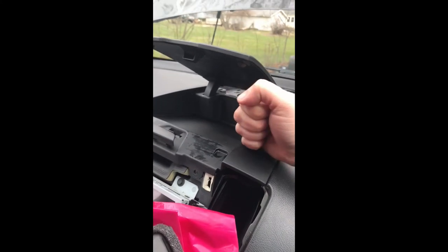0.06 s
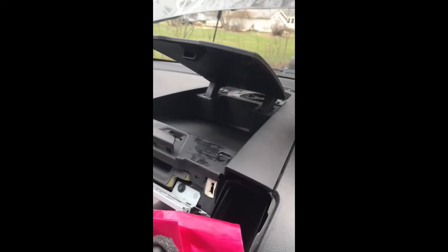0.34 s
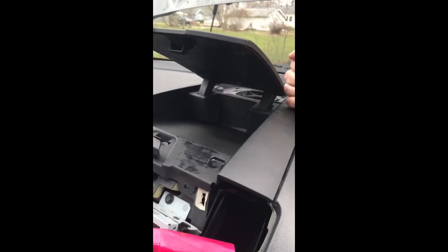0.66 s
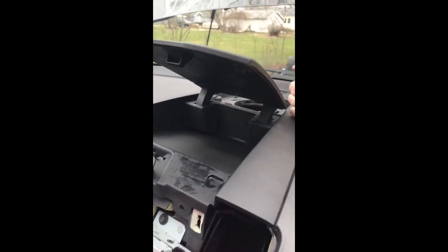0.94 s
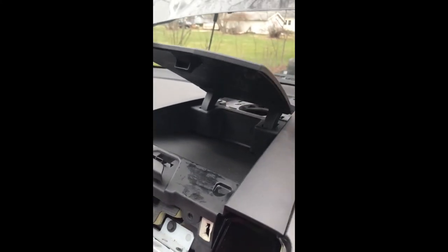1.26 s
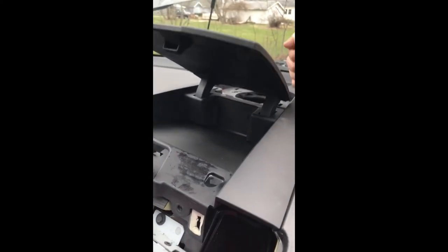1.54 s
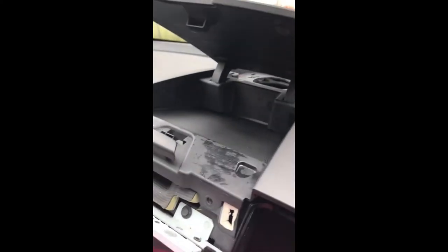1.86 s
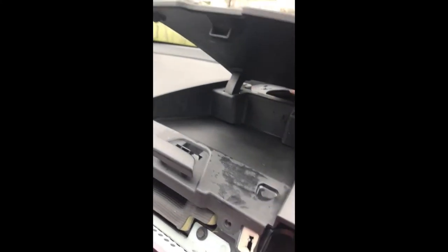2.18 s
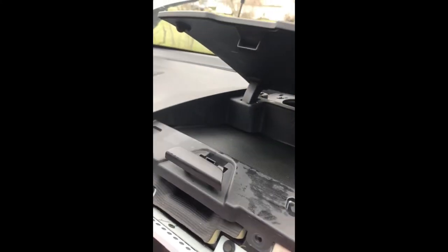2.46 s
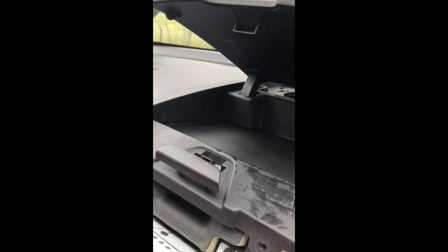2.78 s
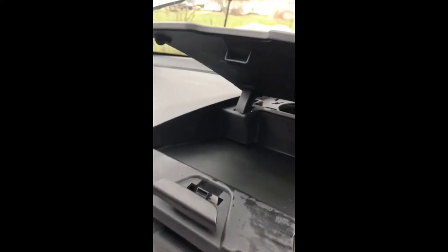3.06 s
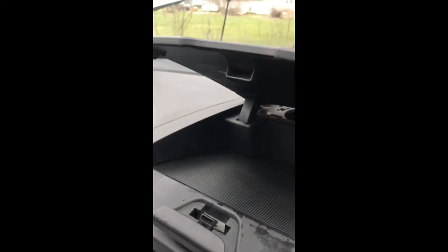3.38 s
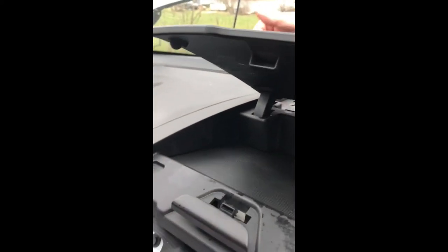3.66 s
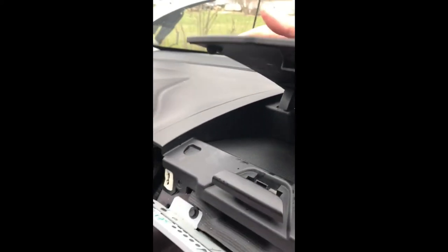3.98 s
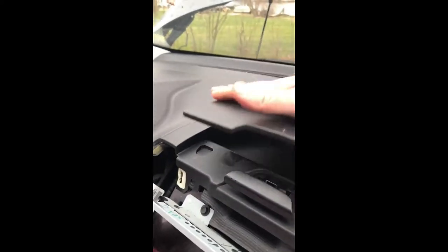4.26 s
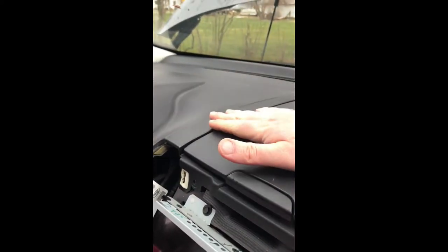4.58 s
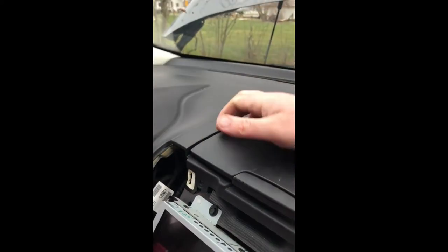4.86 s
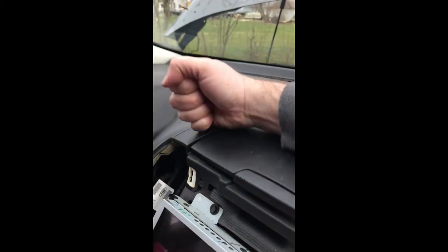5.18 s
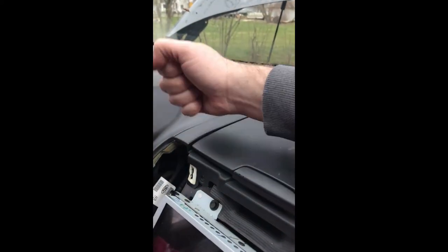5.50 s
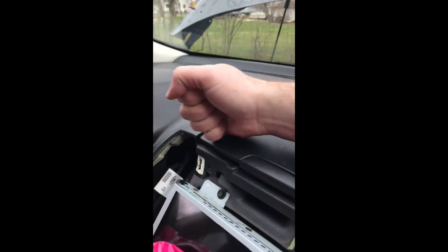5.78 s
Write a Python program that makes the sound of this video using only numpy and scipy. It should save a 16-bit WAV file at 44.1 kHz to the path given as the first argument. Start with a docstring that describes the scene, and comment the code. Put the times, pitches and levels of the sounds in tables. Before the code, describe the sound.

Close, boomy knocks on a car dash and sharp plastic clacks as a bin lid springs open and later latches shut.

```python
"""Inside a parked car, a phone microphone close to the dashboard. Over a low rumble, hand and sleeve brush
about and a few light knocks land. From one second in, a fist thumps the dash and the plastic lid of its
storage bin pops open; later a palm presses it shut and it latches. Each hard blow is a quick cluster of
plastic contacts over a knock of the dash panel and a boom of the cabin air. After it, loose trim buzzes
and the steel latch may ring faintly. The phone's limiter holds the peaks."""
import sys
import numpy as np
from scipy import signal
from scipy.fft import rfft, irfft, next_fast_len
from scipy.io import wavfile
from scipy.ndimage import uniform_filter1d, minimum_filter1d, map_coordinates

SR = 44100
rng = np.random.default_rng(int(sys.argv[2]) if len(sys.argv) > 2 else 0)


def inscribe(sig):
    """Save sig as 16-bit PCM at rate SR to the path in sys.argv[1].

    A 1-D sig is mono; a 2-D sig holds one channel per row.
    Samples are clipped to [-1, 1] before scaling.
    """
    pcm = np.round(np.clip(np.atleast_2d(sig).T, -1, 1) * 32767)
    wavfile.write(sys.argv[1], SR, pcm.astype(np.int16))


N = 257279
AGE = np.arange(SR) / SR  # seconds since a strike

# Levels in the tables are relative within each column.
# contacts of lid, catch and button: start_s, snap_db, clack_db, knock_db, lid_spot_hz, bin_spot_hz
PLASTIC_CONTACTS = [(.003, -29, -37, -46, 1870, 970), (.919, -54, -65, -47.5, 1000, 450),
                    (.9932, -17.5, -25, -32, 1910, 635), (1.006, -5.5, -14.5, -23.5, 1025, 560),
                    (1.0248, -20, -29, -29, 1930, 936), (1.0862, -34, -42, -66, 2140, 640),
                    (2.1207, -2.5, -10, -19.5, 1485, 813), (2.1525, -22, -36.5, -35, 1500, 329),
                    (3.1826, -18.5, -15.5, -22.5, 2200, 560), (3.1915, -3.5, -16, -17.5, 3200, 657),
                    (3.2011, -4, -17.5, -20.5, 2910, 422), (3.3038, -38.5, -46, -60, 1170, 860),
                    (3.328, -50, -52, -58.5, 1120, 866), (4.4528, -12, -22.5, -26, 1550, 560),
                    (4.4936, -44.5, -54, -50.5, 5980, 575), (4.556, -10.5, -24.5, -30, 2000, 820),
                    (4.5648, -3.5, -16.5, -18, 1250, 343.6), (4.7748, -28.5, -40.5, -46, 4960, 950),
                    (4.794, -31.5, -40, -46.5, 5040, 347), (4.845, -32.5, -39, -48, 960, 980),
                    (5.2227, -19.5, -26.5, -25, 1390, 494), (5.2309, -16.5, -20.5, -21.5, 1280, 652),
                    (5.2632, -31, -37, -39.5, 1265, 353), (5.447, -31.5, -42, -45, 5040, 600),
                    (5.636, -21, -27.5, -31, 1460, 480), (5.6462, -24.5, -28.5, -27.5, 996, 320),
                    (5.6803, -32, -31, -43.5, 1230, 550), (5.737, -35, -44, -47, 1070, 607)]
# spectrum of a plastic edge snapping: frequency_hz, level_db
SNAP_SPECTRUM = [(300, -17.5), (1000, -2), (2200, -1), (2900, 3.5), (3400, -1), (4100, -1), (4800, -4),
                 (5300, -2.5), (5700, -1), (6500, -4), (8500, -6), (10000, -8), (12000, -8.5), (16000, -12)]
# resonances of the lid: pitch_hz, width_hz, level_db
LID_MODES = [(1027, 150, 1), (1236, 250, 2.5), (1530, 130, 2), (1755, 100, -0.5), (1935, 94, -0.5),
             (2210, 120, -1.5), (2360, 75, -2), (2720, 35, -2.5), (2917, 54, -9), (2975, 130, -13.5),
             (4130, 160, -12)]
# resonances of the hollow bin: pitch_hz, width_hz, level_db
BIN_MODES = [(333, 55, -5.5), (404, 70, -1.5), (534, 54, -3), (641, 65, 0.5), (756, 73, -4.5),
             (858, 72, -4)]
# blows that shake the dashboard: start_s, panel_db, frame_db, boom_db, panel_hz
DASH_BLOWS = [(.002, -27.5, -33.5, -27.5, 202.5), (.527, -30.5, -36, -38, 139.5),
              (.917, -28.5, -33.5, -43, 225), (.952, -51, -36.5, -27.5, 151),
              (1.006, -9.5, -18.5, -27.5, 206), (1.704, -40.5, -38, -32.5, 229.6),
              (2.122, -5, -25.5, -16, 210.5), (3.194, -12.5, -25.5, -27, 192.5), (4.46, -20, -28, -29, 173),
              (4.565, -13, -41, -30.5, 178.4), (5.231, -8.5, -24.5, -18.5, 211.4),
              (5.647, -13, -31.5, -22, 204.8)]
# modes of the dash panel: ratio_to_panel_hz, level_db, t60_s
PANEL_MODES = [(.64, -9, 0.22), (.8, -7, 0.15), (.9, -2, 0.13), (1.001, 5, 0.094), (1.08, -9.5, 0.11),
               (1.18, -8.5, 0.12), (1.5, -15.5, 0.18), (1.9, -17, 0.12)]
# flicks of the steel latch pawl: start_s, level_db
PAWL_FLICKS = [(1.011, -47.5), (2.128, -30.5), (3.204, -37), (5.249, -33), (5.656, -47)]
# modes of the pawl: pitch_hz, level_db, t60_s
PAWL_MODES = [(9733, -10, .15), (13380, -2, .23), (13520, -6, .17), (13820, -3, .16), (14080, -10, .38),
              (14230, -4, .24)]
# plucks of the long lid spring: start_s, level_db
SPRING_PLUCKS = [(2.128, -49), (5.239, -51)]
# modes of the spring: pitch_hz, level_db, t60_s
SPRING_MODES = [(1701, 0, 1.6), (1723, -1, 1.2)]
# strokes of hand and sleeve: start_s, length_s, hiss_db, rub_db, rub_hz
SLEEVE_STROKES = [(0.009, 0.12, -53, -56.5, 1800), (0.178, 0.63, -59.5, -66, 1880),
                  (0.541, 0.32, -59.5, -59.5, 1540), (0.832, .13, -58.5, -67, 2000),
                  (1.188, 0.051, -55, -75, 2000), (1.289, 0.8, -59.5, -67, 1940),
                  (1.895, 0.47, -60.5, -53, 1250), (2.377, 0.69, -63, -63, 1980),
                  (2.752, 0.24, -66, -61.5, 1940), (3.018, 0.21, -61, -62, 1980),
                  (3.134, 0.15, -44, -52, 2330), (3.442, 0.089, -56, -62, 2200),
                  (3.568, 0.42, -69, -64, 3040), (3.986, 0.12, -52.5, -55.5, 2200),
                  (4.083, .29, -57.5, -56.5, 2000), (4.597, 0.076, -45.5, -50, 2280),
                  (4.808, 0.13, -48, -55, 2760), (5.706, 0.11, -47, -72, 1480)]
# spectrum of their hiss: frequency_hz, level_db
BRUSH_SPECTRUM = [(470, -45.5), (800, -8), (1630, -8.5), (4800, -4), (6330, -3), (10600, -8), (13900, -7),
                  (16000, -7)]
# reverberation of the cabin: frequency_hz, t60_s
CABIN_DECAY = [(100, .25), (500, 0.14), (2000, 0.12), (6000, 0.11), (15000, 0.07)]
# spectrum of the low rumble: frequency_hz, level_db
RUMBLE_SPECTRUM = [(13, -34.5), (22, -9), (35, -7), (54, 1.5), (69, 0), (81, -16), (102, -14.5), (140, -16),
                   (243, -18.5), (360, -30), (614, -34), (700, -32.5), (910, -54.5), (1540, -120)]
# spectrum of the faint midrange wash: frequency_hz, level_db
WASH_SPECTRUM = [(320, -44.5), (550, -18), (781, 1), (890, -1.5), (1060, -3.5), (1310, -4.5), (1810, -11),
                 (2600, -18), (3380, -45.5), (5720, -120)]
# slow swell of the wash: time_s, level_db
WASH_SWELL = [(0.0, -64.5), (0.62, -60.5), (1.32, -63.5), (2.08, -56.5), (2.24, -65), (3.16, -59.5),
              (3.36, -64), (5.83, -64.5)]
# spectrum of the steady hiss: frequency_hz, level_db
HISS_SPECTRUM = [(1060, -37), (1800, -7.5), (2080, -12), (2410, 1), (5490, -5.5), (10300, -11), (14900, -9),
                 (16000, -17)]


def plastic():
    """Each contact snaps at the edge; the lid answers with a clack and the bin with a hollow knock."""
    snaps, hollow = np.zeros((2, N))
    for start_s, snap_db, clack_db, knock_db, lid_hz, bin_hz in PLASTIC_CONTACTS:
        snap, clack, knock = np.zeros((3, SR // 2))
        for delay, edge_db, lid_db, bin_db in bounces():
            add(snap, delay, amp(snap_db + edge_db - 4.5) * chatter(.00072, t60=.038, grain_db=2))
            add(clack, delay, amp(clack_db + lid_db + 2.5) * chatter(.0006, t60=.043, grain_db=2))
            add(knock, delay, amp(knock_db + bin_db + 7.5) * chatter(.00039, t60=.022, grain_db=1.5))
        add(snaps, start_s, snap)
        add(hollow, start_s, filtered(clack, lambda hz: struck(LID_MODES, hz, lid_hz)))
        add(hollow, start_s, filtered(knock, lambda hz: struck(BIN_MODES, hz, bin_hz)))
    return filtered(snaps, causal(SNAP_SPECTRUM)) + hollow


def bounces():
    """A part strikes, seats more dully, then rebounds ever weaker: delay_s, snap_db, clack_db, knock_db."""
    strike, seat = (0, 0, 0, 0), (.006, -11, -4.5, 2.5)
    flights_s = .03 * np.exp(.15 * rng.standard_normal(size=3))
    levels_db = -27.5 - 7.5 * np.arange(len(flights_s))
    rebounds = [(delay, db, db, db) for delay, db in zip(np.cumsum(flights_s), levels_db)]
    return [strike, seat] + rebounds


def chatter(attack_s, t60, grain_db):
    """The dense, uneven micro-impacts of one plastic contact."""
    t = AGE[:SR // 4]
    grain = unit(uniform_filter1d(rng.standard_normal(len(t)), size=24))
    impacts = unit(rng.standard_normal(len(t)) * amp(grain_db * grain))
    return impacts * fade(t, t60) * (1 - np.exp(-t / attack_s))


def struck(modes, hz, spot_hz):
    """A body's response at unit power; the resonances near the struck spot's own speak loudest."""
    emphasis = 1 + 2.7 * resonance(hz, spot_hz, width=.1 * spot_hz)
    return unit(body(modes, hz) * emphasis + 4 * resonance(hz, spot_hz, width=70))


def body(modes, hz):
    """A plastic part's resonances, summed with alternating signs, at unit power."""
    return unit(sum((-1) ** k * amp(db) * resonance(hz, centre, width)
                    for k, (centre, width, db) in enumerate(modes)))


def dashboard():
    """A blow flexes the dash panel and its frame, which pump the lowest air mode of the cabin."""
    out = np.zeros(N)
    for start_s, panel_db, frame_db, boom_db, panel_hz in DASH_BLOWS:
        modes = [(ratio * panel_hz, db, t60) for ratio, db, t60 in PANEL_MODES]
        add(out, start_s, amp(panel_db - .36) * ring(modes, attack_s=.0056))
        add(out, start_s, amp(frame_db + 9.5) * mode(hz=92, t60=.23, attack_s=.02))
        add(out, start_s, amp(boom_db + 8) * mode(hz=53, t60=.35, attack_s=.025))
    return out


def ring(modes, attack_s):
    """Modes struck together, each about a decibel stronger or weaker every time."""
    return sum(amp(db + rng.standard_normal()) * mode(hz, t60, attack_s) for hz, db, t60 in modes)


def mode(hz, t60, attack_s):
    """A damped sine that builds up over the attack time."""
    return np.sin(2 * np.pi * hz * AGE) * fade(AGE, t60) * (1 - np.exp(-AGE / attack_s))


def trim_rattle():
    """Loose trim buzzes against the lid while the dashboard settles, the louder the harder the blow."""
    hard_blow_db, lag_s = -10, .012
    buzz = np.zeros(N)
    for start_s, panel_db, *_ in DASH_BLOWS:
        buzz_db = -33.5 + 1.1 * (panel_db - hard_blow_db)
        add(buzz, start_s + lag_s, amp(buzz_db) * chatter(.0021, t60=.24, grain_db=-1.5))
    buzz *= amp(1.5 * wobble(110))
    edge = causal(SNAP_SPECTRUM)
    return filtered(buzz, lambda hz: body(LID_MODES, hz) + amp(-4) * body(BIN_MODES, hz)
                    + amp(-2.5) * edge(hz))


def latch():
    """The small steel pawl sings briefly when flicked; the long lid spring swells slowly and rings on."""
    out = np.zeros(N)
    for start_s, db in PAWL_FLICKS:
        add(out, start_s, amp(db) * ring(PAWL_MODES, attack_s=.015))
    for start_s, db in SPRING_PLUCKS:
        add(out, start_s, amp(db) * ring(SPRING_MODES, attack_s=.14))
    return out


def brushing():
    """Skin and cloth slide near the microphone: a wide hiss over a narrower rubbing band."""
    hiss_level, rub = np.zeros((2, N))
    for start_s, length_s, hiss_db, rub_db, rub_hz in SLEEVE_STROKES:
        pressure = stroke(length_s)
        friction = rng.standard_normal(len(pressure))
        band = filtered(friction, lambda hz: resonance(hz, rub_hz, width=1.53 * rub_hz) ** 2)
        add(hiss_level, start_s, amp(hiss_db) * pressure)
        add(rub, start_s, amp(rub_db) * pressure * unit(band))
    return (hiss_level * noise(BRUSH_SPECTRUM) + rub) * amp(1.2 * wobble(71))


def stroke(length_s):
    """Pressure of one stroke: it catches, holds and lets go, each ease lasting at most 0.1 s."""
    t = np.arange(max(int(length_s * SR), 2)) / SR
    rise_s, fall_s = np.minimum([.2 * length_s, .44 * length_s], .1)
    ramp = np.clip(np.minimum(t / rise_s, (length_s - t) / fall_s), 0, 1)
    return np.sin(np.pi / 2 * ramp) ** 2


def cabin_echo(x):
    """The short, dense echo of glass and upholstery around the microphone."""
    hz, t, spectra = signal.stft(rng.standard_normal(SR // 2), SR, nperseg=256)
    tail = signal.istft(spectra * fade(t, along(CABIN_DECAY, hz)[:, None]), SR, nperseg=256)[1]
    tail *= 1 - np.exp(-AGE[:len(tail)] / .00083)  # the echo builds in about a millisecond
    return signal.fftconvolve(x, tail / np.linalg.norm(tail))[:N]


def background():
    """Room tone of the closed car: uneven rumble, a slowly swelling midrange wash, a thin steady hiss."""
    rumble = amp(-45.5 + 2.3 * wobble(9)) * noise(RUMBLE_SPECTRUM)
    swell_db = 1 + np.interp(np.arange(N) / SR, *np.transpose(WASH_SWELL))
    wash = amp(swell_db + .71 * wobble(6.8)) * noise(WASH_SPECTRUM)
    return rumble + wash + amp(-70) * noise(HISS_SPECTRUM)


def noise(spectrum):
    """Coloured noise of rms 1."""
    return unit(filtered(rng.standard_normal(N), lambda hz: amp(along(spectrum, hz))))


def wobble(rate_hz):
    """A smooth random curve, rate_hz knots a second."""
    knots = rng.standard_normal(int(N * rate_hz / SR) + 4)
    return map_coordinates(knots, [np.arange(N) * rate_hz / SR])


def resonance(hz, centre, width):
    """Causal response of one resonance, centre and width in Hz."""
    return 1j * hz * width / (centre ** 2 - hz ** 2 + 1j * hz * width)


def causal(spectrum):
    """Minimum-phase response of unit power with the given spectrum."""
    def response(hz):
        cepstrum = irfft(np.log(unit(amp(along(spectrum, hz)))))
        half = len(cepstrum) // 2
        return np.exp(rfft(np.r_[cepstrum[0], 2 * cepstrum[1:half]], 2 * half))
    return response


def filtered(x, response):
    """Pass x through a complex response of frequency."""
    size = next_fast_len(len(x) + SR // 2)
    hz = np.fft.rfftfreq(size, 1 / SR)
    return irfft(rfft(x, size) * response(hz), size)[:len(x)]


def along(points, hz):
    """Read (frequency_hz, value) points on a log frequency axis."""
    frequencies, values = np.transpose(points)
    return np.interp(np.log(hz + 1), np.log(frequencies + 1), values)


def add(track, start_s, sound):
    """Mix a sound into the track at start_s."""
    start = max(round(start_s * SR), 0)
    part = track[start:start + len(sound)]
    part += sound[:len(part)]


def fade(t, t60):
    """Exponential decay, 60 dB in t60 seconds."""
    return amp(-60 * t / t60)


def amp(db):
    """Decibels to gain."""
    return 10 ** (np.asarray(db) / 20)


def unit(x):
    """Scale to rms 1."""
    return x / np.sqrt(np.mean(np.abs(x) ** 2) + 1e-20)


def scene():
    """Lid, dashboard, latch and hand from close by, in mono, with a little cabin echo and room tone."""
    clicks, thumps = plastic(), dashboard()
    echo = cabin_echo(amp(-15.5) * clicks + amp(-12) * thumps)
    return (clicks + thumps + trim_rattle() + echo + latch() + brushing() + background())[None]


def record(dry):
    """The phone's fast limiter holds the peaks; a steep low-pass then cuts the highest treble."""
    ceiling_db, top_hz = -3.5, 16100
    x = dry[0]
    needed_gain = np.minimum(1, amp(ceiling_db) / (np.abs(x) + 1e-9))
    gain = uniform_filter1d(minimum_filter1d(needed_gain, size=31), size=31)
    return filtered(x * gain, lambda hz: 1 / (1 + (hz / top_hz) ** 120))[None]


dry = scene()
out = record(dry)
inscribe(out)
```